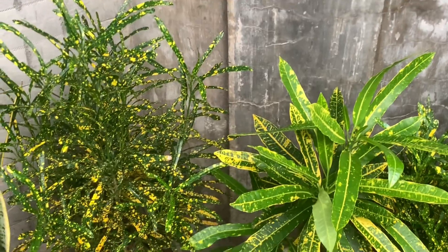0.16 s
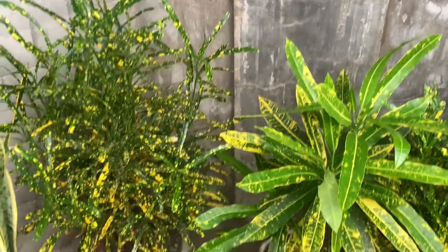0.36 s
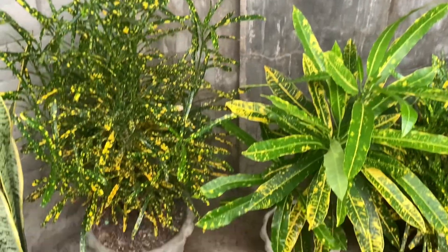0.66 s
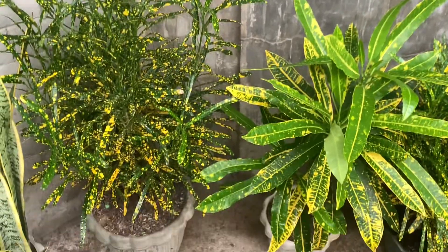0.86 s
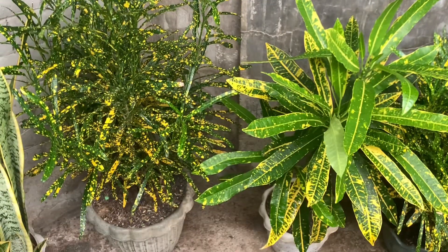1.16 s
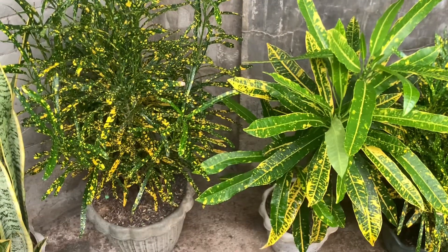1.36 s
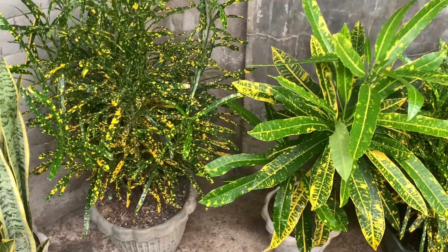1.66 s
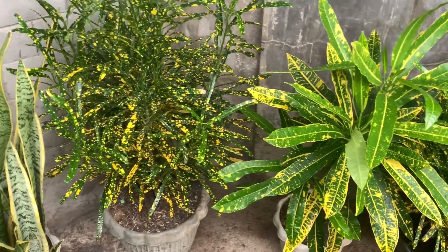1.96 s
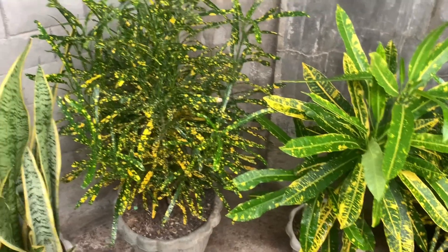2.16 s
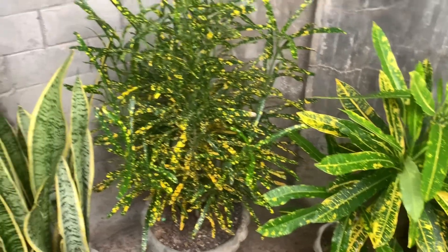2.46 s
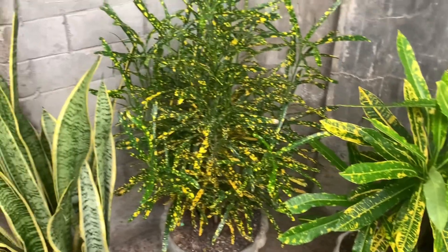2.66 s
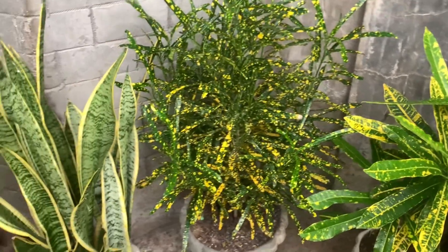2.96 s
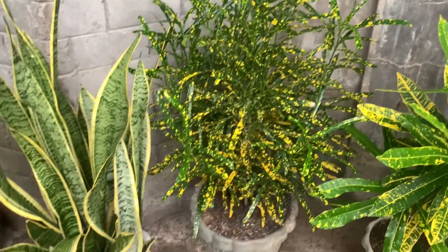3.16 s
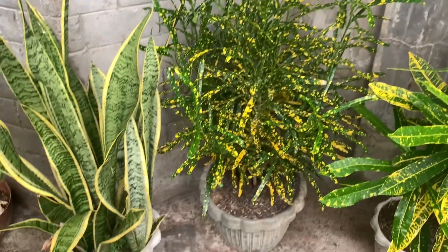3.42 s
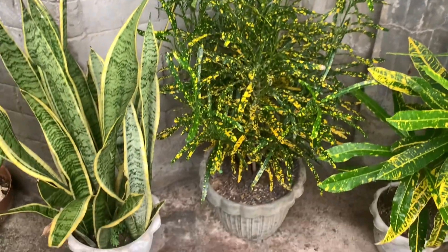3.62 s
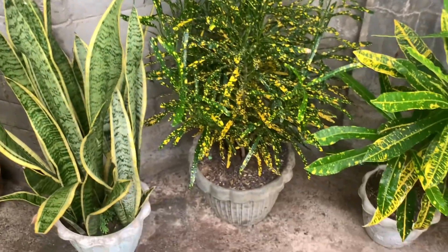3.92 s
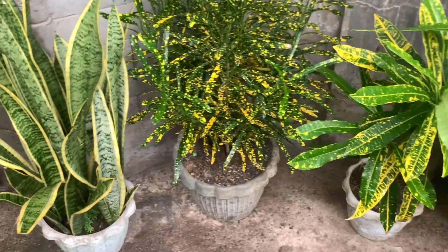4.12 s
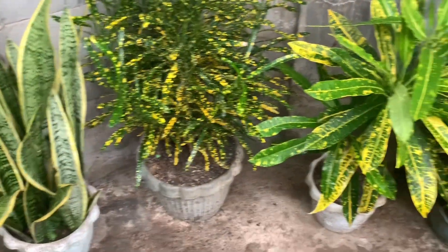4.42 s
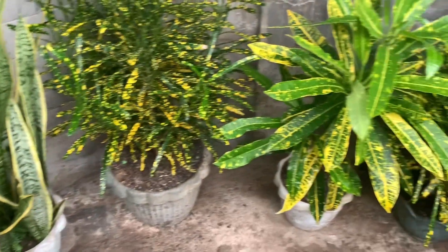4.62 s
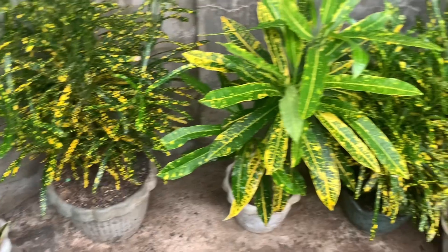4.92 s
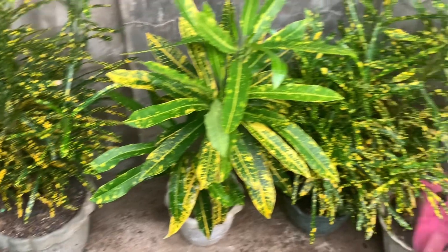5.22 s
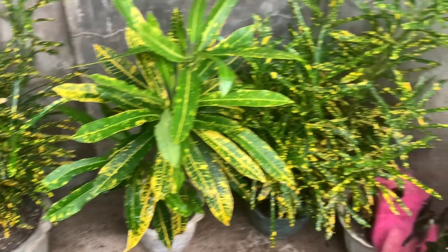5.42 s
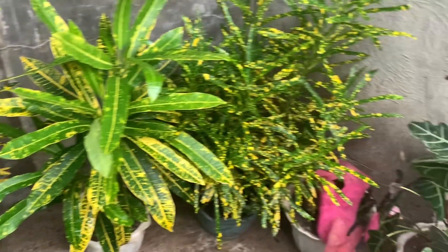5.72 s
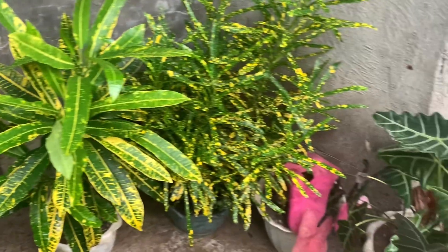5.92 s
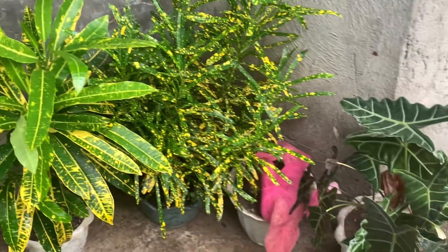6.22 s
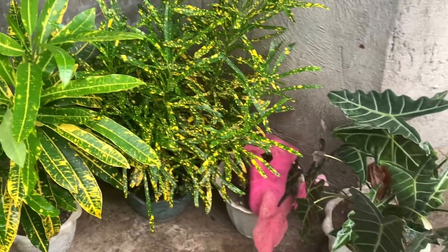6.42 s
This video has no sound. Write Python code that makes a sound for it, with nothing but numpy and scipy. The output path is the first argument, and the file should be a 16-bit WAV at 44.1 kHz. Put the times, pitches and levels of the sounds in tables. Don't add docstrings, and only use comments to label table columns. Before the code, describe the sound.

Rain falls steadily in a walled yard with potted plants, a broad grainy hiss of far drops with little ticks on leaves and faint spray. Right beside the microphone, runoff drops strike a thin, taut, wet sheet. A softer thump comes at 0.2 s, then a rapid spatter from 0.5 to 0.7 s ending in a hard crack. More hits land at 0.95, 1.1 and 1.2 s, then heavy single blows at about 1.6, 2.1, 2.65 and 3.2 s, and a tight, very strong pair near 3.8 s. Each snaps, rings briefly hollow, and flaps low, the hiss dipping momentarily after the hardest. The rain thins from 3 s, quietest around 4.4 s. Separate thumps follow at 4.25, 4.7 and 5.15 s, then only faint taps near 5.5 and 5.7 s as the hiss slowly swells until 6.6 s.

```python
import sys
import numpy as np
from scipy import signal
from scipy.fft import rfft, irfft
from scipy.io import wavfile
from scipy.ndimage import uniform_filter1d, minimum_filter1d

SR = 44100
rng = np.random.default_rng(int(sys.argv[2]) if len(sys.argv) > 2 else 0)


def boost_factor(decibels):
    exponent = np.asarray(decibels, float) / 20
    return 10 ** exponent


def dump(signal):
    limited = np.clip(np.atleast_2d(signal).T, -1, 1)
    pcm = np.round(limited * 32767).astype(np.int16)
    wavfile.write(sys.argv[1], SR, pcm)


N = 290173
HISS_EDGE_HZ = 15780


def evened(x):
    return x / np.sqrt(np.mean(x ** 2) + 1e-20)


def add(mix, start_s, sound):
    part = mix[round(start_s * SR):][:len(sound)]
    part += sound[:len(part)]


def puff(pitch_hz, width, decay, grit):
    t = np.arange(len(grit)) / SR
    pole = np.exp(-np.pi * width / SR)
    band = signal.lfilter([1], np.poly([pole, pole]), grit * np.exp(-t / decay))
    return band / abs(band).max() * np.cos(2 * np.pi * pitch_hz * t)


def ring(t, level_db, pitch_hz, t60, rise):
    soft_start = 1 - np.exp(-(t / rise) ** 2)
    return boost_factor(level_db - 60 * t / t60) * np.sin(2 * np.pi * pitch_hz * t) * soft_start


# (pitch_hz, width_hz, level_db)
HOUSING = [(2250, 350, 2.5), (3720, 2400, 3), (4650, 370, -2.5), (5670, 360, 2.5), (6780, 1100, -4),
           (10700, 610, 6.5)]


def housing_db(hz):
    return sum(db / (1 + (2 * (hz - centre) / width) ** 2) for centre, width, db in HOUSING)


def patter(per_s, spread_db):
    size = boost_factor(spread_db * np.minimum(rng.exponential(1, N), 3.5))
    clicks = size * (rng.random(N) < per_s / SR)
    splash = np.exp(-np.arange(200) / (SR * 0.00062))
    return evened(signal.oaconvolve(clicks, splash)[:N] * rng.standard_normal(N))


# (time_s, level_db)
RAIN_STRENGTH = [(0.0, -33.5), (0.27, -33.5), (0.66, -32), (1.36, -33.5), (2.44, -34), (3.13, -35.5),
                 (3.43, -37), (3.79, -38.5), (3.98, -40), (4.42, -41), (4.93, -39), (5.54, -39.5),
                 (6.58, -36)]
# (pitch_hz, level_db per Hz)
RAIN_COLOUR = [(15, -28), (25, -2), (55, 1), (107, -4.5), (205, -2.5), (261, -3), (526, 0.5), (951, -0.5),
               (1720, -6.5), (2020, -4.5), (4930, -23), (6990, -20), (8680, -38), (10800, -37),
               (15700, -43)]


def wash():
    mix = evened(rng.standard_normal(N)) * boost_factor(-3) + patter(per_s=900, spread_db=1.0) * boost_factor(-8.5)
    hz, t, z = signal.stft(mix, SR, nperseg=512, noverlap=384)

    patches = rng.standard_normal(z.shape[::-1]).T
    patches = uniform_filter1d(patches, size=8, axis=0)
    patches = evened(uniform_filter1d(patches, size=16, axis=1))

    time_s, level_db = np.transpose(RAIN_STRENGTH)
    mean_db = level_db.mean()
    fizz = 1 / (1 + (3000 / (hz + 1)) ** 4)
    rumble = 1 / (1 + (hz / 250) ** 4)
    follows = 1 - fizz - rumble + 0.94 * fizz + 1.23 * rumble
    swell_db = np.outer(follows, np.interp(t, time_s, level_db - mean_db))

    # brief bright streaks a few kHz tall, heard only in the fizz
    streaks = (rng.random(z.shape[::-1]) < .0012).T * rng.exponential(1, z.shape[::-1]).T
    streaks = uniform_filter1d(streaks, size=45, axis=0)
    streaks = 45 * uniform_filter1d(streaks, size=15, axis=0)
    z = z * boost_factor(swell_db + 1.35 * patches + 4.7 * fizz[:, None] * np.minimum(streaks, 3))
    rain = signal.istft(z, SR, nperseg=512, noverlap=384)[1][:N]

    hz = np.fft.rfftfreq(N, 1 / SR)
    colour_hz, colour_db = np.transpose(RAIN_COLOUR)
    colour_db = np.interp(np.log(hz + 1), np.log(colour_hz + 1), colour_db)
    colour = boost_factor(colour_db + housing_db(hz)) * (hz < HISS_EDGE_HZ)
    colour = colour / np.sqrt(np.mean(colour ** 2))
    return boost_factor(mean_db + 1.5) * irfft(rfft(rain) * colour, N)


# (start_s, depth_db, hold_s)
DUCKS = [(.714, 11, .015), (1.174, 9, .021), (1.633, 13, .019), (2.134, 8, .02), (2.656, 17, .016),
         (3.204, 21, .015), (3.764, 11, .013), (3.838, 22, .013), (5.160, 5, .02)]


def ducking(rain):
    t = np.arange(N) / SR
    low = signal.oaconvolve(rain, signal.firwin(255, 2500, fs=SR), "same")
    out = np.zeros(N)
    for part, depth, length in ((low, .85, .7), (rain - low, 1, 1)):
        sink_db = np.zeros(N)
        for start_s, db, hold_s in DUCKS:
            fall = np.clip((t - start_s) / .004, 0, 1)
            recovery = np.clip(1 - (t - start_s - length * hold_s) / .007, 0, 1)
            sink_db += db * fall * recovery
        out += part * boost_factor(-depth * sink_db)
    return out


def strays():
    per_s = 14
    when, size, pitch, fine = rng.random((round(per_s * N / SR), 4)).T
    start_s = when * N / SR
    level_db = np.interp(start_s, *np.transpose(RAIN_STRENGTH)) - 3 + 3 * np.log(size + .05)
    return list(zip(start_s, level_db, 4000 + 2200 * pitch, level_db - 24 + 16 * fine))


# (start_s, level_db, pitch_hz, spray_db)
TICKS = [(0.0578, -27, 5170, -64), (0.2823, -32, 6070, -65), (0.3097, -31, 5780, -56),
         (0.3541, -29, 4110, -61), (0.7315, -25, 5770, -55), (0.7974, -36, 4620, -50),
         (1.1982, -40, 4290, -56), (1.3268, -30, 5890, -59), (1.375, -30, 5740, -59),
         (1.6535, -38, 4040, -57), (1.6714, -29, 5860, -56), (1.7422, -24.5, 4000, -56),
         (2.0138, -36, 5930, -54), (2.0208, -31, 5970, -59), (2.047, -33, 6140, -59),
         (2.0864, -29, 5700, -59), (2.2003, -28, 5800, -53), (2.2364, -39, 4190, -61),
         (2.5536, -35, 4010, -59), (2.7307, -34, 5490, -59), (3.4106, -31, 4060, -61),
         (3.5079, -33, 5540, -62), (3.937, -35, 4050, -42), (4.202, -36, 4290, -61),
         (4.5377, -36, 5800, -46), (4.6917, -28.5, 4060, -57), (5.2588, -36, 4370, -61),
         (5.4732, -33, 4200, -68), (5.7148, -33, 5250, -64), (6.3994, -35, 6850, -51)]
# (start_s, level_db)
MIST = [(0.1326, -50), (0.3207, -60), (0.6005, -47), (0.8126, -44), (0.8839, -44), (1.5184, -44),
        (1.5788, -56), (1.7075, -46), (1.7674, -44), (1.8886, -48), (2.7437, -40), (3.3019, -44),
        (4.4628, -56), (4.8199, -46), (5.6346, -49), (5.907, -50), (6.4592, -43), (6.539, -49)]
# (start_s, level_db, pitch_hz, spray_db)
SPLASHES = [(0.182, -15.5, 4640, -23.5), (0.5208, -9, 6200, -14), (0.5306, -19, 5030, -33),
            (0.5455, -36, 6000, -36), (0.5525, -28, 5500, -48), (0.5578, -30, 6000, -42),
            (0.5706, -24.5, 5520, -50), (0.6619, -11, 5270, -29), (0.6679, -9, 5700, -24),
            (0.674, -18, 6000, -34), (0.679, -26, 6030, -42), (0.6846, -29, 5500, -42),
            (0.7113, -26, 4170, -14), (0.8594, -15, 4000, -45), (0.9273, -21, 6100, -30),
            (0.9386, -32, 6000, -50), (0.9512, -39, 4970, -43), (1.1065, -14.5, 5430, -17),
            (1.1712, -4.5, 4100, -22), (1.6294, -16, 5930, -28), (2.1287, -14, 5830, -50),
            (2.4269, -38, 4300, -47), (2.6524, -12.5, 5470, -42), (3.2011, -20, 4080, -27),
            (3.7604, -14.5, 5700, -35), (3.8353, -7, 3950, -38), (4.2485, -39, 4120, -33),
            (4.7242, -27, 7750, -58), (5.1547, -24, 5700, -40)]


def leaves():
    mist_hz = 10400
    splash_lag_s = .0008
    drops = [(s + splash_lag_s, db, hz, spray_db) for s, db, hz, spray_db in SPLASHES]
    drops += [(s, db + 2.5, hz, spray_db + 8) for s, db, hz, spray_db in TICKS]
    drops += [(s, -90, mist_hz, db + 6.5) for s, db in MIST]
    drops += strays()
    out = np.zeros(N)
    grits = rng.standard_normal((len(drops), 3, 300))
    for (start_s, level_db, pitch_hz, spray_db), grit in zip(drops, grits):
        leaf = puff(pitch_hz, width=3200, decay=.0007, grit=grit[0])
        spray = boost_factor(-11) * puff(12170, width=6300, decay=0.001, grit=grit[1])
        spray += boost_factor(-3.5) * puff(mist_hz, width=5600, decay=0.0004, grit=grit[2])
        add(out, start_s, boost_factor(level_db - 2.0) * leaf + boost_factor(spray_db) * spray)
    lowpass = signal.firwin(511, HISS_EDGE_HZ - 150, window=("kaiser", 9), fs=SR)
    return signal.oaconvolve(out, lowpass, "same")


def bending(t, start_hz, turns, fade):
    t = np.maximum(t, 0)
    contact = turns / start_hz
    wave = np.sin(2 * np.pi * turns * np.log(1 + t / contact))
    return wave * (1 - np.exp(-t / contact)) * np.exp(-(t / fade) ** 2)


def blow(crack_db, wave_db, thump_db, crack_hz, crest_s, spot, grit):
    t = np.arange(len(grit)) / SR
    crack = bending(t, 1.518 * crack_hz, turns=2.124, fade=0.0047)
    crack += ring(t, 0.29, crack_hz, t60=0.007, rise=0.0001)
    crack += boost_factor(1.5) * puff(crack_hz, width=2500, decay=.0009, grit=grit)

    wave = bending(t, 1670, turns=1.675, fade=0.56 * crest_s)
    rebound_s = .001 + 0.0028 * spot[0]
    wave += boost_factor(-3.5) * bending(t - rebound_s, 901, turns=3.21, fade=1.25 * crest_s)

    drawn = t * .0125 / crest_s
    heave = bending(drawn, 2520, turns=1.8, fade=0.015) * (1 - np.exp(-(drawn / .005) ** 2))
    return boost_factor(crack_db - 1.5) * crack + boost_factor(wave_db + 0.5) * wave + boost_factor(thump_db + 1) * heave


# (start_s, crack_db, wave_db, thump_db, last_bass_crest_s)
BLOWS = [(0.183, -19.5, -26, -7.5, 0.0049), (0.7121, -2, -4.5, -6, 0.012),
         (0.9524, -18.5, -17, -11.5, 0.0062), (1.1029, -6.5, -14, -5.5, 0.0062), (1.1725, 2, -7, -4, 0.011),
         (1.6302, -8.5, -23, -3.5, 0.012), (2.1316, -5.5, -17, -3, 0.0115), (2.6535, 2, -15, -2.5, 0.00975),
         (3.2018, -8, -6, -4, 0.0083), (3.7611, -12, -18, 1.5, 0.00503), (3.8362, -18.5, -6, 1, 0.00326),
         (4.2494, -24, -49, -12.5, 0.0089), (4.7253, -21.5, -9.5, -4, 0.013),
         (5.1558, -7.5, -16.5, -2.5, 0.012)]
# (start_s, crack_db, wave_db, last_bass_crest_s); the last row, at 5.712 s,
# is all but silent
SPATTER = [(0.5216, -11.5, -23, 0.01), (0.5292, -19, -14, 0.0061), (0.5373, -36, -15.5, 0.0071),
           (0.5466, -19, -20, 0.0051), (0.5527, -19.5, -15.5, 0.0073), (0.574, -26, -30, 0.0058),
           (0.6624, -3, -34, .004), (0.6646, -9.5, -10, 0.0058), (0.668, -9, -14, 0.0034),
           (0.675, -15, -34, .006), (0.6793, -20, -10.5, 0.0054), (0.6859, -33, -24, 0.0055),
           (0.8591, -20, -37, 0.005), (0.928, -20, -31, 0.0066), (0.9395, -24, -40, .004),
           (1.1062, -13, -20, 0.0052), (2.427, -24, -22, 0.0066), (3.9512, -27, -14.5, 0.0033),
           (5.5052, -44, -36, 0.0045), (5.712, -44, -52, 0.0074)]
# (start_s, level_db, pitch_hz)
KNOCKS = [(0.185, -21, 710), (0.531, -7.5, 765), (0.545, -8, 690), (0.662, -20, 810), (0.68, -7, 650),
          (0.712, -2.5, 624), (0.953, -9.5, 880), (1.173, -17, 650), (1.6315, -3, 666), (2.133, 3, 660),
          (2.654, 0, 737), (3.202, -20, 645), (3.762, -2, 657), (3.836, -10, 555), (3.952, -25, 780),
          (4.251, -12.5, 730), (4.7265, -2.5, 587), (5.158, -13.5, 725), (5.506, -21, 940),
          (.1842, -11, 865), (1.6312, 1, 3400), (1.632, -8, 1510), (2.1316, 5, 3040), (2.6535, -14, 1350),
           (2.6562, -20, 354), (3.2003, -13, 1430), (3.7617, -8, 3600), (3.7616, -8, 1010),
           (3.7802, -22, 402), (3.8361, -23, 3600), (4.2541, -14, 266), (4.7258, -24, 1030),
           (5.155, -14, 2500)]
# (start_s, level_db, pitch_hz)
FLAPS = [(0.185, -13.5, 96), (.532, -15.5, 96), (0.549, -18, 98), (.676, -19, 97), (0.956, -18, 97),
         (1.106, -12, 97), (2.429, -26, 110), (3.956, -25, 97), (0.722, -6, 97), (1.183, -5.5, 98.4),
         (1.641, -5, 96), (2.143, -1, 95), (2.659, -10, 97), (3.208, -2, 98.5), (3.767, -7, 96),
         (3.843, -1, 97), (4.254, -1, 82), (4.733, 0.5, 87), (5.166, -2.5, 94)]


def sheet():
    out = np.zeros(N)
    t = np.arange(4000) / SR
    light = [(s, crack_db, wave_db, wave_db - 5.5, crest_s) for s, crack_db, wave_db, crest_s in SPATTER]
    drops = sorted(BLOWS + light)
    spots = rng.random((len(drops), 3))
    grits = rng.standard_normal((len(drops), 3000))
    for (start_s, *levels_db, crest_s), spot, grit in zip(drops, spots, grits):
        crack_hz = 2195 * (1 + 0.088 * (spot[1] - .5))
        add(out, start_s, blow(*levels_db, crack_hz, crest_s, spot, grit))
    for start_s, level_db, pitch_hz in KNOCKS:
        t60 = 0.0038 + 8.9 / pitch_hz
        add(out, start_s, ring(t, level_db - 0.5, pitch_hz, t60, rise=0.00069))
    for start_s, level_db, pitch_hz in FLAPS:
        add(out, start_s, ring(t, level_db + 5.5, pitch_hz, t60=0.047, rise=0.011))
        overtone = ring(t, level_db - 16, 2.11 * pitch_hz, t60=0.037, rise=0.00081)
        add(out, start_s + 1.076 / pitch_hz, overtone)
    dull_hz = 4800
    return signal.sosfilt(signal.butter(2, dull_hz, fs=SR, output="sos"), out)


def scene():
    return (ducking(wash()) + leaves() + sheet())[None]


def low_pass(x):
    return signal.sosfilt(signal.butter(12, 16820, fs=SR, output="sos"), x)


def record(dry):
    ceiling, edge_hz = .62, 16800
    cut_db = -20 * np.log10(np.maximum(abs(dry[0]) / ceiling, 1))
    held_db = uniform_filter1d(minimum_filter1d(cut_db, size=80), size=60)
    lowpass = signal.firwin(511, edge_hz, window=("kaiser", 11), fs=SR)
    mix = signal.oaconvolve(dry * boost_factor(held_db), lowpass[None], "same")
    return low_pass(mix)


dry = scene()
out = record(dry)
dump(out)
```